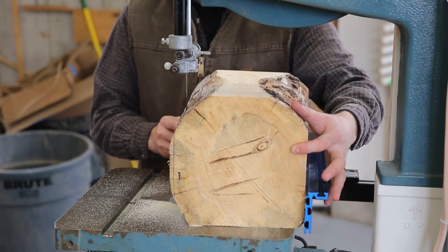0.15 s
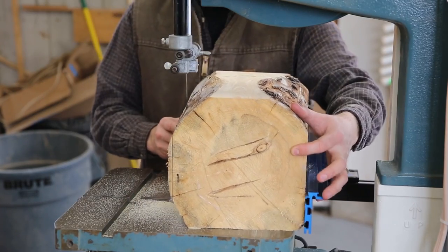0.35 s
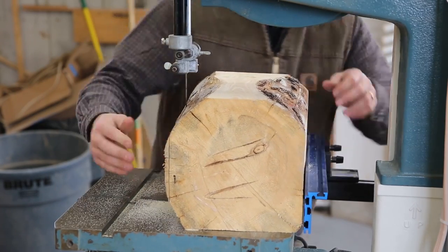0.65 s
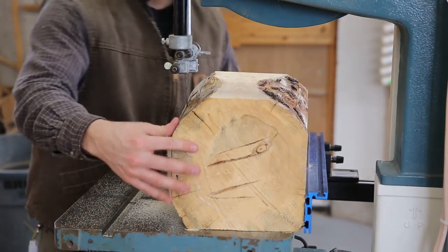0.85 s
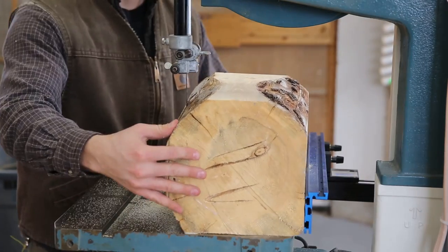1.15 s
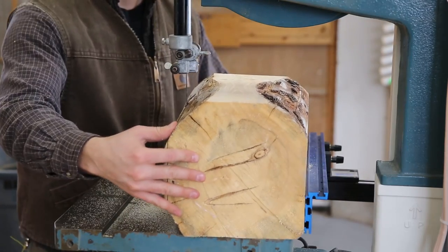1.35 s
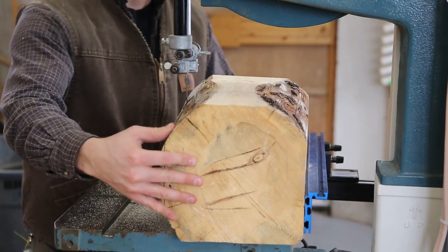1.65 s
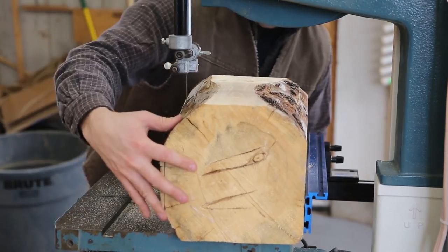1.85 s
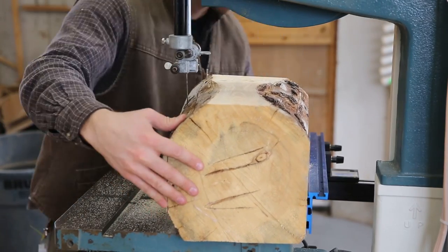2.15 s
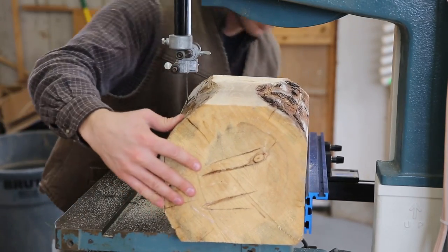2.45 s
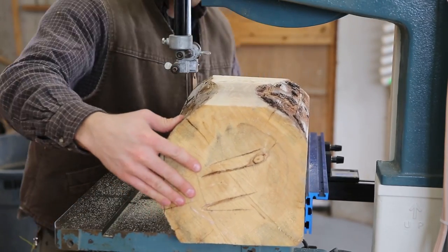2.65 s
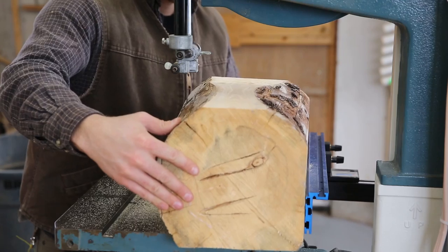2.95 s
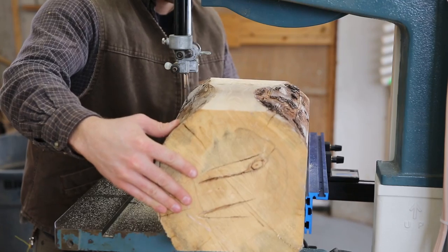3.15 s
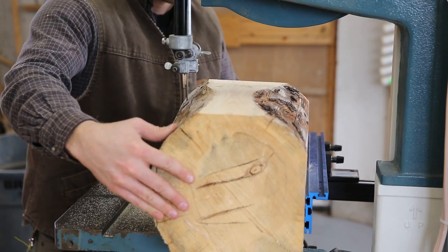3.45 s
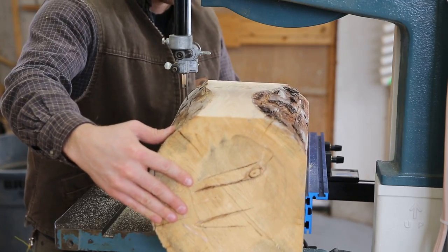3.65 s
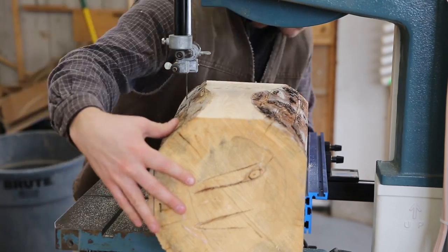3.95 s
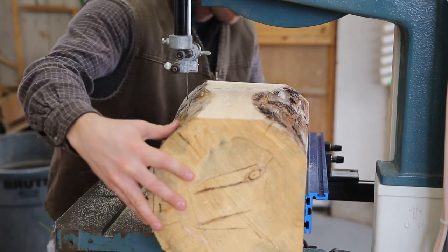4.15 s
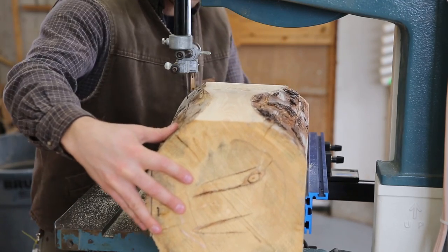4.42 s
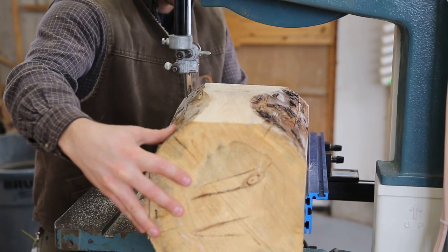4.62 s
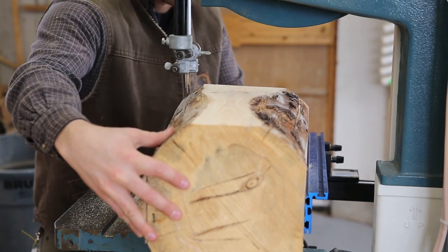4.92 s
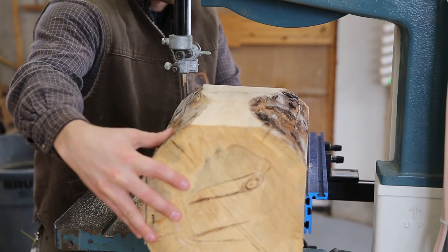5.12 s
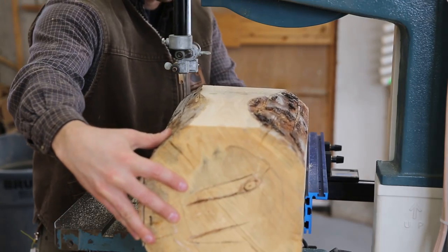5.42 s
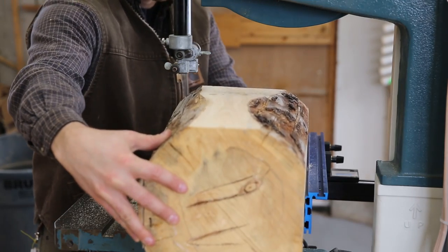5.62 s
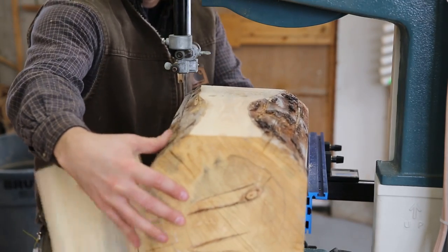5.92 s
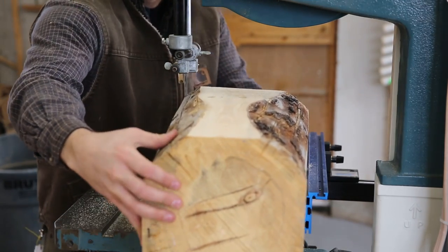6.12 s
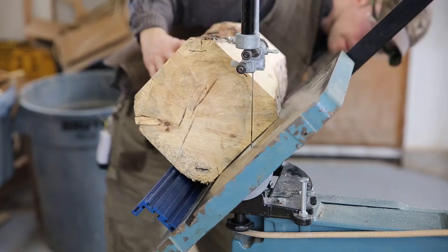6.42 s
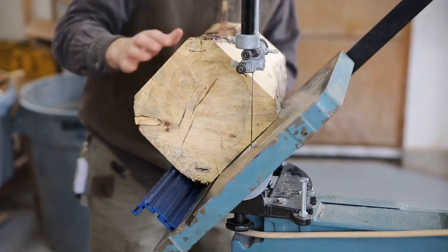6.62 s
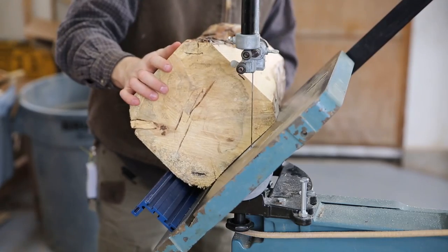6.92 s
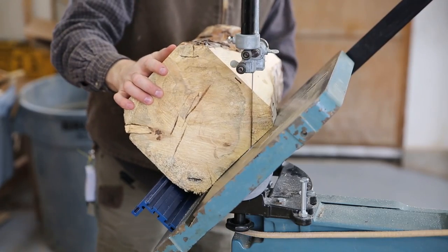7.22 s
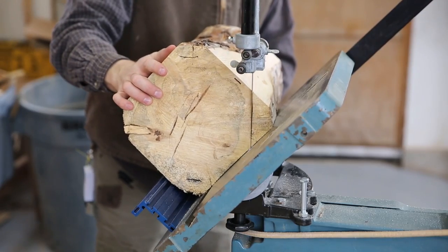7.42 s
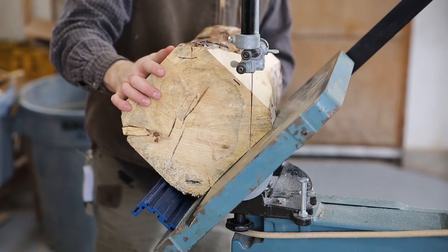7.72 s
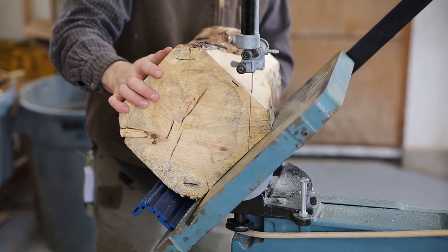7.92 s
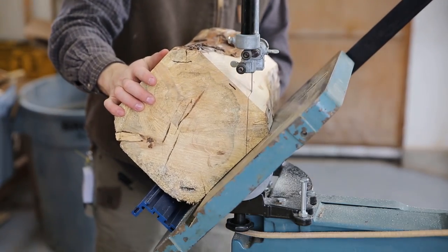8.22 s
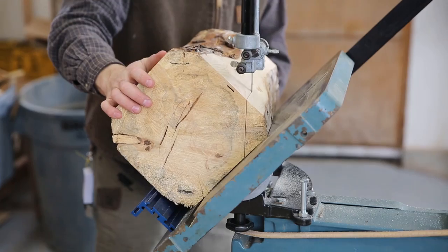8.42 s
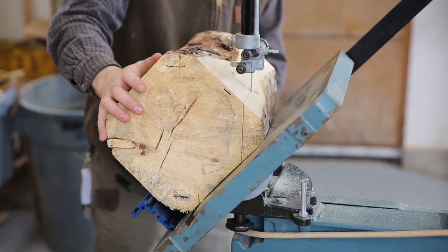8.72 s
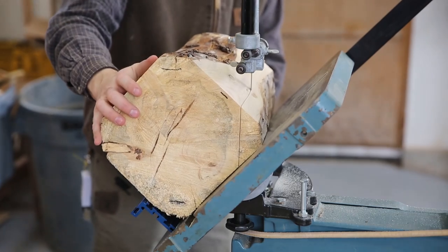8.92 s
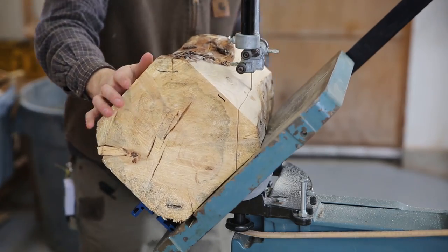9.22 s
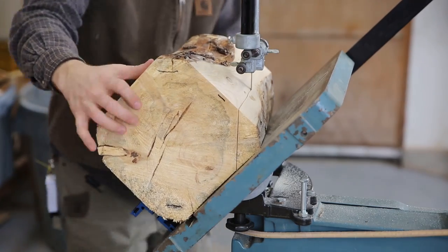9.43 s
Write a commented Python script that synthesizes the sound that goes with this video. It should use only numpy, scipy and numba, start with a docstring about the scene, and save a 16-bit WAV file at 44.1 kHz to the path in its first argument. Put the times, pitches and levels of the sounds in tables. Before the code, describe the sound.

An electric bandsaw whirrs and hums, heard close and dry. Its teeth bite into a log with high, rasping squeals, broken by short gaps and small catching ticks. The cutting fades, wood slides and knocks on metal, and the motor idles with a fuller drone. A second cut then builds into a sustained, purer screech with hissing dust, the hum sinking beneath it.

```python
"""Bandsaw cutting a log

A bandsaw cuts a log, first on a level table, then on a tilted one. Under feed the blade slows, its teeth drive
the band's modes into a squeal and sawdust hisses. Between the cuts the log slides and knocks on the table.
The motor hums on mains harmonics over the whirr of the wheels, shaped noise with frame and blade resonances.
A limiter turns everything down at the loud peaks, so the hum sinks whenever the blade squeals."""
import sys
import numpy as np
from scipy import signal
from scipy.fft import rfft, irfft, next_fast_len
from scipy.io import wavfile
from scipy.ndimage import uniform_filter1d
from numba import njit

SR = 44100
rng = np.random.default_rng(int(sys.argv[2]) if len(sys.argv) > 2 else 0)


def store_wav(level_fs):
    """Save 16-bit WAV to argv[1]."""
    pcm = np.round(np.clip(np.atleast_2d(level_fs), -1, 1) * 32767)
    wavfile.write(sys.argv[1], SR, pcm.T.astype(np.int16))


N = 422037
TIME = np.arange(N) / SR
TILT_S = 6.459  # the tilted table is heard from here on
IDLE_HZ = 305  # teeth per second without load
SLOT_HZ = 1439.5  # main whine of the motor
WHISTLE_HZ, WHISTLE_DB = 12950, -47  # guide bearings at idle speed; level over the tilted table


def undb(db):
    """Logarithmic level: decibels to amplitude gain."""
    return 10 ** (np.asarray(db) / 20)


def unit(x):
    """Normalization: scale to rms 1."""
    return x / np.sqrt(np.mean(np.abs(x) ** 2))


def turn(hz):
    """Phase as the integral of frequency, in radians."""
    return 2 * np.pi * np.cumsum(hz * np.ones(N)) / SR


def lag(x, seconds):
    """First-order inertia: follow x exponentially, starting settled."""
    keep = np.exp(-1 / (seconds * SR))
    return x[0] + signal.lfilter([1 - keep], [1, -keep], x - x[0])


def walk(hz):
    """Band-limited random motion: about hz new values a second, smoothed."""
    knots = rng.standard_normal(N // 8)
    path = np.interp(TIME * hz, np.arange(len(knots)), knots)
    return unit(uniform_filter1d(path, max(int(SR / hz), 1)))


def brief_changes(table):
    """Gaussian envelopes: smooth brief changes of level, in dB."""
    return sum(db * np.exp(-((TIME - s) / half) ** 2) for s, half, db in table)


def noise(colour, resonances=(), force=1):
    """Source and filter: random force given a spectrum, lifted at each resonance."""
    hz, db = np.transpose(colour)
    size = next_fast_len(N)
    bins = np.maximum(np.fft.rfftfreq(size, 1 / SR), 1)
    gain = undb(np.interp(np.log(bins), np.log(hz), db))
    for centre, width, lift_db in resonances:
        gain = gain * undb(lift_db / (1 + (2 * (bins - centre) / width) ** 2))
    spectrum = rfft(force * rng.standard_normal(N), size)
    return irfft(spectrum * unit(gain), size)[:N]


def ring(hz, width_hz):
    """Self-excited oscillation: a mode nearly steady in size, unsteady in phase."""
    z = walk(width_hz) + 1j * walk(width_hz)
    saturated = z / np.sqrt(np.abs(z) ** 2 + 1.13)
    return unit(np.real(saturated * np.exp(1j * turn(hz))))


RELEASE_S = .028  # the teeth let go
SLACK_HZ, GLIDE_S = 8286, .04  # squeal pitch at first touch; time it takes to settle
SQUEAL_LAW, PITCH_LAW = 0.73, .4  # powers of the load that squeal strength and pitch drop follow
UNEVEN_DB, UNEVEN_HZ = 1.67, 21.76  # random unevenness of the feed
IDLE_DUST_DB, IDLE_DUST_TILTED_DB = -33.5, -38.5  # the band brushing the kerf without cutting
# stretches of feed, touching and rubbing at the blade; pitch and levels hold at the middle load of each:
# (start [s], end [s], grip time [s], first load [0-1], last load [0-1], squeal pitch [Hz],
#  squeal level [dB], low blade modes level [dB], sawdust level [dB])
STRETCHES = [(-0.3, 0.544, .02, .42, 0.65, 7590, -4.5, -16, -16.5),
             (1.02, 1.501, .012, .62, 0.6, 7476, -7, -16.5, -20),
             (1.5, 1.705, .025, 0.43, 0.46, 7300, -9.5, -12.5, -21),
             (2.42, 2.54, 0.016, 0.1, 0.15, 7906, -22, -25.5, -40),
             (2.625, 2.88, .016, .42, 0.44, 7400, -5.5, -15, -23.5),
             (2.88, 3.837, 0.027, 0.52, .7, 7467, -6, -16.5, -21.5),
             (4.011, 4.079, .02, 0.01, 0.02, 8143, -25.5, -27, -35),
             (4.195, 4.24, .015, 0.18, 0.35, 7414, -16.5, -25, -21),
             (4.3, 4.928, 0.014, 1, 0.95, 7396, -5, -16.5, -16.5),
             (4.93, 5.134, 0.024, 0.73, 0.58, 7500, -7, -17.5, -17.5),
             (5.175, 5.552, .02, 0.6, .4, 7725, -10, -18.5, -20),
             (5.55, 5.782, 0.029, 0.39, 0.17, 7990, -14, -48, -25.5),
             (7.14, 7.659, .035, 0.03, .14, 7954, -14.5, -22, -20.5),
             (7.631, 8.929, 0.077, 0.26, 0.5, 7692, -1, -17.5, -15.5),
             (8.936, 9.21, .028, 0.23, 0.42, 7616, -2, -10, -13.5),
             (9.23, 9.6, 0.028, 0.01, 0.08, 7900, -28.5, -44, -26)]


def feed():
    """Friction under feed: more load makes the squeal louder and lower. Gives load, pitch and three gains."""
    load, drop_hz, squeal, low, dust = np.zeros((5, N))
    for start, end, grip_s, first, last, hz, squeal_db, low_db, dust_db in STRETCHES:
        attack = 1 - np.exp(-np.maximum(TIME - start, 0) / grip_s)
        grip = attack * np.exp(-np.maximum(TIME - end, 0) / RELEASE_S)
        force = np.maximum(np.interp(TIME, [start, end], [first, last]), .01)
        effort = 2 * force / max(first + last, .02)  # 1 at the middle load
        load += grip * force
        drop_hz += grip * (SLACK_HZ - hz) * effort ** PITCH_LAW
        squeal += grip * undb(squeal_db) * effort ** SQUEAL_LAW
        low += grip * undb(low_db) * effort ** SQUEAL_LAW
        dust += grip * undb(dust_db)
    uneven = undb(UNEVEN_DB * walk(UNEVEN_HZ))
    idle = undb(np.where(TIME < TILT_S, IDLE_DUST_DB, IDLE_DUST_TILTED_DB))
    pitch_hz = SLACK_HZ - lag(drop_hz, GLIDE_S)
    return load, pitch_hz, squeal * uneven, low * uneven, np.hypot(dust, idle)


def bites(tooth_hz, scatter_db, count=104):
    """Periodic forcing: each tooth bites differently, and the set of the band repeats every lap of count teeth."""
    tooth = turn(tooth_hz) / (2 * np.pi)
    k = np.arange(int(tooth[-1]) + 2)
    tooth_set = rng.standard_normal(count)[k % count]
    size = unit(rng.standard_normal(len(k)) + .5 * tooth_set)
    # the ringing of one bite carries over into the next
    force = signal.lfilter([1], [1, -.1], undb(scatter_db * 2 * np.tanh(size)))
    force = uniform_filter1d(force[tooth.astype(int)], size=60)
    return unit(force * (1 - .35 * np.cos(2 * np.pi * tooth)))


def blade_squeal(tooth_hz, pitch_hz, on_level):
    """Mode coupling: deep cuts bring in the lower mode of a pair, shallow ones lift and blur the upper."""
    upper_hz = np.maximum(pitch_hz, 7700)
    deep = np.clip((7760 - pitch_hz) / 600, .05, .85)
    upper_level = ring(upper_hz + 90 * walk(150), width_hz=460)
    upper_tilted = ring(upper_hz + 35 * walk(60), width_hz=160)
    upper = np.where(on_level, upper_level, upper_tilted)
    lower = ring(7190 + 90 * walk(150), width_hz=670)
    pair = np.sqrt(1 - deep) * upper + np.sqrt(deep) * lower
    blur = np.clip((pitch_hz - 7700) / 400, .1, .9)
    squeal = np.sqrt(1 - blur) * pair + np.sqrt(blur) * ring(pitch_hz, width_hz=1900)
    overtone = ring(1.42 * pitch_hz + 80 * walk(8), width_hz=520)
    return squeal + undb(-13.5 + 4.6 * walk(60)) * deep * on_level * overtone


# low modes of the blade: (multiple of the squeal pitch, width [Hz], relative level [dB])
LOW_MODES = [(0.473, 199.5, 6.5), (.51, 266.8, 3.5), (0.551, 291.7, -1)]


def low_blade_modes(bite, pitch_hz, on_level):
    """Modal excitation: modes about an octave down glide with the squeal and are struck in ragged bursts."""
    span_hz = pitch_hz * np.where(on_level, 1, 1.09)  # the tilted cut leaves a stiffer length of blade
    low = 0
    for ratio, width, db in LOW_MODES:
        low = low + undb(db + 2.9 * walk(90)) * ring(ratio * span_hz, width_hz=width)
    chatter = unit(bite ** 0.84 * undb(2.2 * walk(220)))
    return chatter * unit(low)


CATCH_S = 0.0034  # half length of a catch
# single teeth catching: (time [s], level [dB])
CATCHES = [(2.586, -6.5), (2.617, -3), (4.069, -12.5), (4.11, -11), (4.205, -10), (4.23, -6), (4.278, -4),
           (4.3, -3.5)]


def tooth_catches():
    """Impulsive excitation: single catches set off short bursts of a broad mode."""
    catch = sum(undb(db) * np.exp(-((TIME - s) / CATCH_S) ** 2) for s, db in CATCHES)
    return catch * ring(7450, width_hz=1500)


# sawdust torn from the kerf: (frequency [Hz], relative density [dB])
DUST = [(60, -28), (300, -15), (900, -31), (2000, -10.5), (2900, -1.5), (4400, -1.5), (5700, -1),
        (8400, -3), (9400, -2.5), (10700, 5), (12500, 4.5), (13600, 2), (15500, 2)]


def sawdust(bite, dust_gain):
    """Amplitude-modulated noise: the hiss of sawdust pulses gently with the bites."""
    return undb(4.5) * dust_gain * noise(DUST) * unit(bite ** 0.34)


# the band presses on its guide bearings and their whine swells: (time [s], half length [s], change [dB])
GUIDE_SWELLS = [(5.7, 0.12, 14)]


def guide_bearings(whistle_hz, squeal_gain, dust_gain):
    """Rotational tone: bearings whine in step with the band, most when it rubs without squealing."""
    rubbing = np.clip(dust_gain / (squeal_gain + 1e-6), .1, 1.8) ** 0.24
    whine_db = -5.0 + 3.4 * walk(70) + brief_changes(GUIDE_SWELLS)
    return undb(whine_db) * dust_gain * rubbing * ring(whistle_hz, width_hz=420)


IDLE_RING_HZ, IDLE_RING_DB = 7480, -36.5  # the free blade sings faintly over the tilted table
# wavering rings of the blade at fixed pitch in the tilted cut: (frequency [Hz], level over the dust gain [dB])
FIXED_RINGS = [(2680, -14.5), (4500, -10.5), (5130, -13)]


def tilted_rings(whistle_hz, dust_gain):
    """Resonance at fixed pitch: blade rings follow the sawdust level, beside faint idle tones."""
    rings = dust_gain * sum(undb(db + 3 * walk(35)) * ring(hz, width_hz=130) for hz, db in FIXED_RINGS)
    singing = undb(IDLE_RING_DB) * ring(IDLE_RING_HZ, width_hz=280)
    return rings + singing + undb(WHISTLE_DB) * ring(whistle_hz, width_hz=120)


def blade(tooth_hz, pitch_hz, squeal_gain, low_gain, dust_gain):
    """Forced and self-excited vibration: the teeth roughen the squeal, strike low modes and tear out sawdust."""
    on_level = TIME < TILT_S
    bite = np.where(on_level, bites(tooth_hz, scatter_db=3.0), bites(tooth_hz, scatter_db=2.0))
    squeal = bite * squeal_gain * blade_squeal(tooth_hz, pitch_hz, on_level)
    low = low_gain * low_blade_modes(bite, pitch_hz, on_level)
    whistle_hz = WHISTLE_HZ * tooth_hz / IDLE_HZ
    whine = guide_bearings(whistle_hz, squeal_gain, dust_gain)
    rings = np.where(on_level, 0, tilted_rings(whistle_hz, dust_gain))
    return squeal + tooth_catches() + low + sawdust(bite, dust_gain) + whine + rings


# log sliding on the table: (time [s], level [dB])
SLIDE = [(5.3, -64), (5.75, -54), (5.92, -39), (6.03, -22.5), (6.1, -14.5), (6.17, -27.5), (6.45, -29)]
# colour of the scraping: (frequency [Hz], relative density [dB])
SCRAPE = [(60, -43), (200, -15), (400, -9), (700, 5.5), (3000, 0.5), (6000, -3.5), (8500, -9)]
# log catching on the table, halved in strength below: (time [s], level [dB])
KNOCKS = [(5.966, -11), (6.043, -18), (6.096, -27), (6.136, -5)]


def log_on_table():
    """Sliding friction: random contact force as the log scrapes over the iron table, with decaying knocks."""
    slide_s, slide_db = np.transpose(SLIDE)
    wavering_db = np.interp(TIME, slide_s, slide_db) + 3.1 * walk(90)
    force = undb(wavering_db) * (TIME < TILT_S)
    for s, db in KNOCKS:
        force = force + .5 * undb(db) * (TIME >= s) * np.exp(-np.abs(TIME - s) / 0.0043)
    return noise(SCRAPE, force=force)


def hum(lines, waver_db, waver_rad):
    """Additive synthesis: steady tones that tremble a little, the upper ones more in phase."""
    total = 0
    for hz, db in lines:
        gain = np.sqrt(2) * undb(db + waver_db * walk(30))
        phase = 2 * np.pi * hz * TIME + waver_rad * hz / SLOT_HZ * walk(25)
        total = total + gain * np.sin(phase)
    return total


# hum beside the level table, before wavering and fades: (frequency [Hz], rms level [dB])
HUM_LEVEL = [(959.6, -45), (1439.5, -22.5), (1677, -64), (1920, -39.5), (4319, -39), (5766, -39),
             (7198, -37.5)]
# the motor's tones beside the level table fade briefly: (time [s], half length [s], change [dB])
WHINE_DIPS = [(4.05, 0.023, -14), (5.9, 0.069, -8.5), (6.2, 0.44, -3.5)]


def motor_level(tooth_hz):
    """Rotor slip: under load the slot tone falls away from the mains harmonic and beats with it."""
    slip_hz = .8 * (IDLE_HZ - tooth_hz)
    slot = np.sqrt(2) * np.sin(turn(SLOT_HZ - slip_hz)) * np.clip(slip_hz / 8, 0, 1)
    slot_db = HUM_LEVEL[1][1] - 3.5  # relative to the main whine
    tones = hum(HUM_LEVEL, waver_db=1.74, waver_rad=1 / 10) + undb(slot_db) * slot
    return undb(brief_changes(WHINE_DIPS)) * tones


DRONE_DB = -33  # the motor's low drone
DRONE_IDLE_DB, DRONE_SINKS_S, DRONE_FADE_S = 9.5, 7.12, 0.28  # louder at the tilted table until the blade enters
# the low drone fades briefly: (time [s], half length [s], change [dB])
DRONE_DIPS = [(1.69, 0.096, -23), (4.03, .1, -23), (5.72, 0.17, -14)]


def motor_drone():
    """Subharmonic tone: a drone at a third of the motor's whine."""
    idling = (TIME > TILT_S) * np.exp(-np.maximum(TIME - DRONE_SINKS_S, 0) / DRONE_FADE_S)
    drone_db = DRONE_DB + DRONE_IDLE_DB * idling + brief_changes(DRONE_DIPS)
    return hum([(SLOT_HZ / 3, drone_db)], waver_db=1.2, waver_rad=.2)


BELT_HZ, BELT_SAG_HZ, BELT_LAG_S, BELT_DB = 721, 194, .35, -40.5
BELT_TILTED_HZ, BELT_TILTED_DB = 655, -50.5


def belt_level(load):
    """Load-dependent pitch: the belt tone sinks and weakens under load; its pitch recovers slowly."""
    belt_hz = BELT_HZ - BELT_SAG_HZ * lag(load, BELT_LAG_S)
    return undb(BELT_DB + 2.8 * walk(15) - 15 * load) * ring(belt_hz, width_hz=26)


WHEEL_HZ = 18.4  # turns per second at idle
# hum beside the tilted table, before wavering: (frequency [Hz], rms level [dB])
HUM_TILTED = [(220.7, -51), (959.6, -42.5), (1421.1, -35), (1439.5, -16.5), (1494.2, -34), (1512.6, -37),
              (1678, -41.5), (1991, -38)]
# whirr of wheels and band beside the level and the tilted table: (frequency [Hz], relative density [dB])
WHIRR_LEVEL = [(30, -39), (170, -46), (225, -14.5), (350, -31), (440, -3.5), (590, -9), (720, -1.5),
               (1150, -3.5), (1450, 3), (2050, -4), (3000, 4.5), (8500, -5.5), (11000, -2)]
WHIRR_TILTED = [(50, -41), (175, -22), (225, -10), (350, -18.5), (440, 3), (720, -9.5), (1450, 6.5),
                (2100, 1.5), (2700, 3.5), (3300, -4.5), (6000, -7.5), (7700, -5.5), (9500, -14.5)]
# resonances of the frame and of the free-running blade: (frequency [Hz], width [Hz], lift above the whirr [dB])
RESONANCES = [(214, 17, 9.5), (295, 16, 16), (3063, 36, 11.5), (4386, 37, 13.5), (7540, 120, 6),
              (8680, 110, 4)]


def machine(tooth_hz, load):
    """Rotational modulation: hum, belt and whirr throb at multiples of the wheel rate."""
    wheel = turn(WHEEL_HZ * tooth_hz / IDLE_HZ)
    throb = 1 + 0.11 * np.sin(2 * wheel) + 0.02 * (np.sin(3 * wheel) + np.sin(4 * wheel))
    level_whirr = undb(-18.5) * noise(WHIRR_LEVEL, RESONANCES)
    level = motor_level(tooth_hz) + belt_level(load) + level_whirr
    tilted_whirr = undb(-24.5) * noise(WHIRR_TILTED, RESONANCES)
    tilted_belt = undb(BELT_TILTED_DB) * ring(BELT_TILTED_HZ, width_hz=5.4)
    tilted = hum(HUM_TILTED, waver_db=1.5, waver_rad=0.066) + tilted_whirr + tilted_belt
    return throb * (np.where(TIME < TILT_S, level, tilted) + motor_drone())


SAG_HZ, INERTIA_S = 27.86, 0.088  # teeth per second lost at full load; lag of the wheels


def scene():
    """Superposition: saw and log add up, alike in both channels; the load slows the band."""
    load, *cut = feed()
    tooth_hz = IDLE_HZ - SAG_HZ * lag(load, INERTIA_S)
    mono = machine(tooth_hz, load) + blade(tooth_hz, *cut) + log_on_table()
    return np.tile(mono, (2, 1))


@njit
def follow(x, attack, release):
    """Envelope detection: a peak follower that rises quickly and falls slowly."""
    out, e = np.empty(len(x)), x[:2000].max()
    for i in range(len(x)):
        e += (x[i] - e) * attack if x[i] > e else -e * release
        out[i] = e
    return out


def limit(x, ceiling_db, attack_s, release_s):
    """Dynamic range limiting: turn the gain down as far as the peaks exceed the ceiling."""
    peak = follow(np.abs(x), 1 / (1 + attack_s * SR), 1 / (1 + release_s * SR))
    return x / np.maximum(peak / undb(ceiling_db), 1)


TOP_HZ = 15720  # upper edge of the sound


def record(dry):
    """Limiting and low-pass filtering: a limiter holds the level, then the top is cut."""
    held = limit(dry[0], ceiling_db=-9.0, attack_s=0.00017, release_s=0.15)
    low_pass = signal.ellip(12, .1, 80, TOP_HZ, fs=SR, output="sos")
    return np.tile(signal.sosfilt(low_pass, held), (2, 1))


dry = scene()
out = record(dry)
store_wav(out)
```